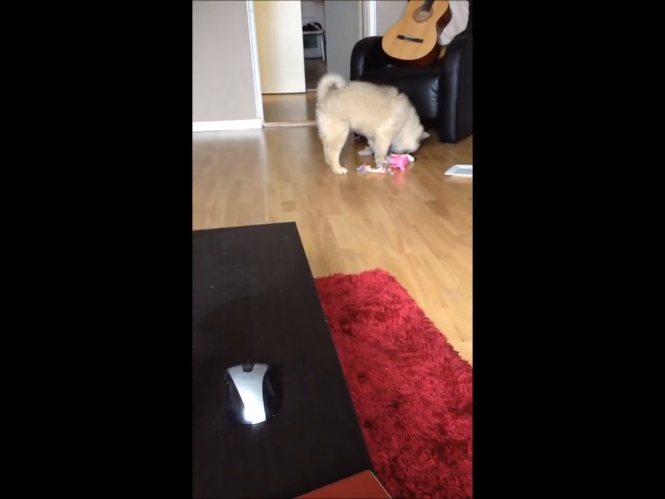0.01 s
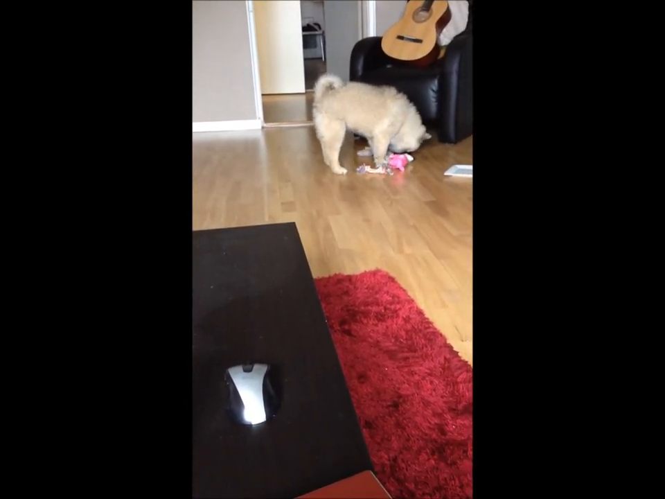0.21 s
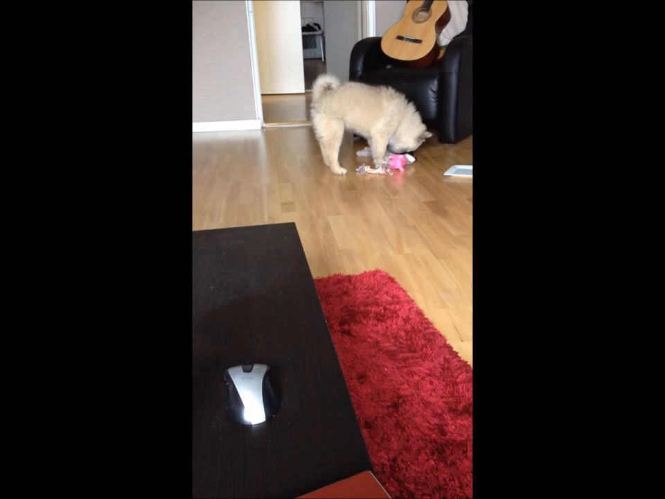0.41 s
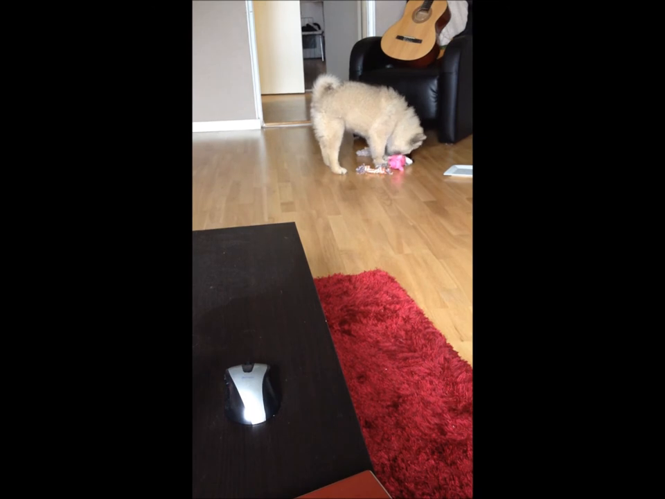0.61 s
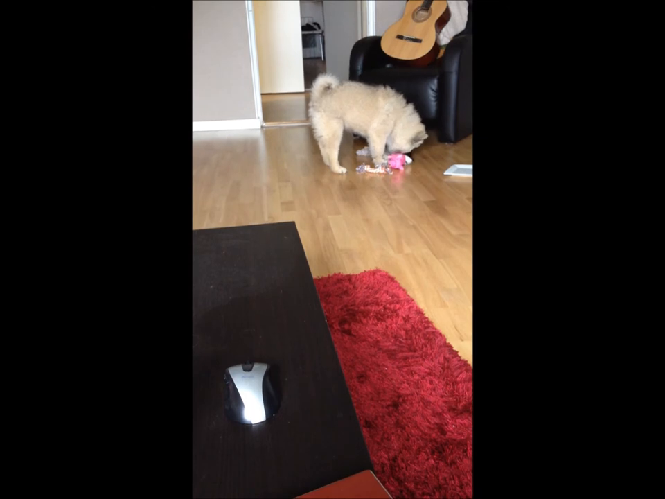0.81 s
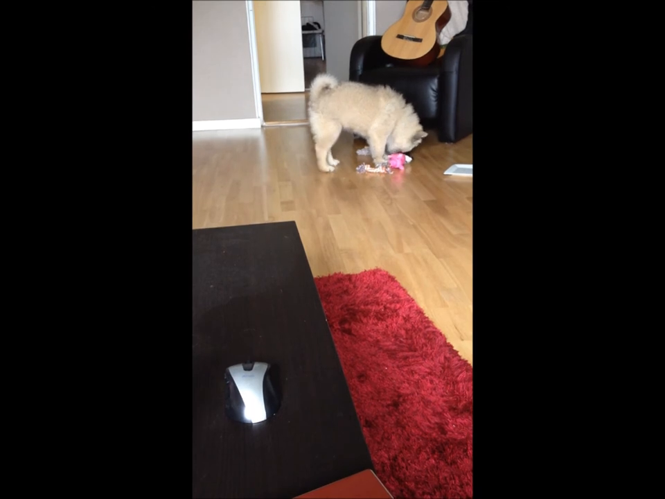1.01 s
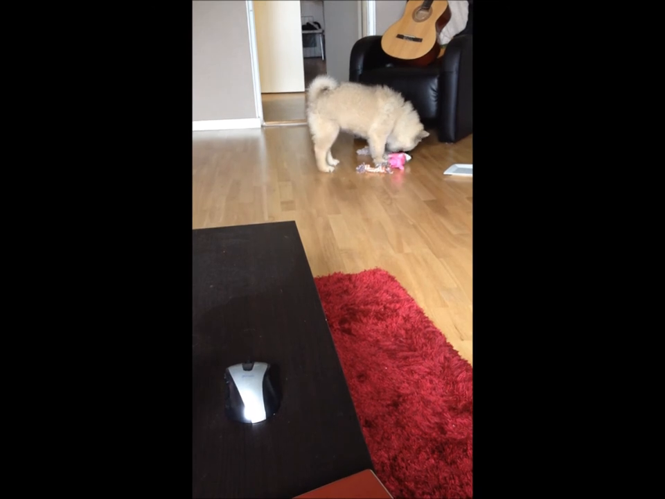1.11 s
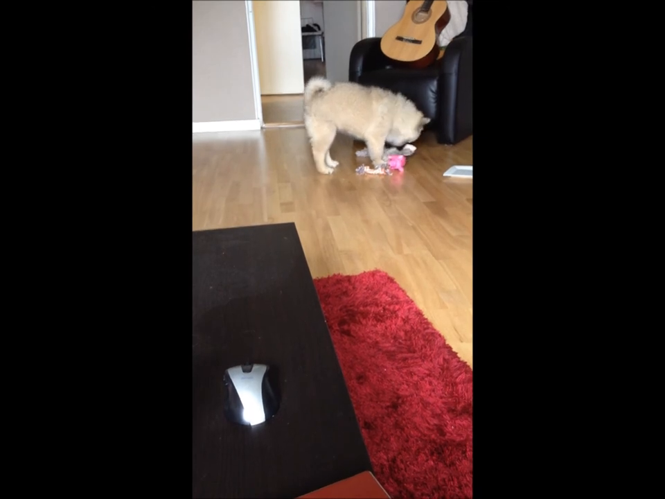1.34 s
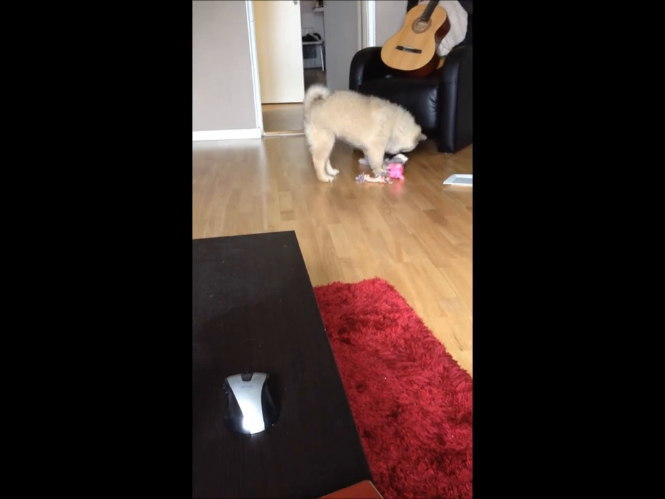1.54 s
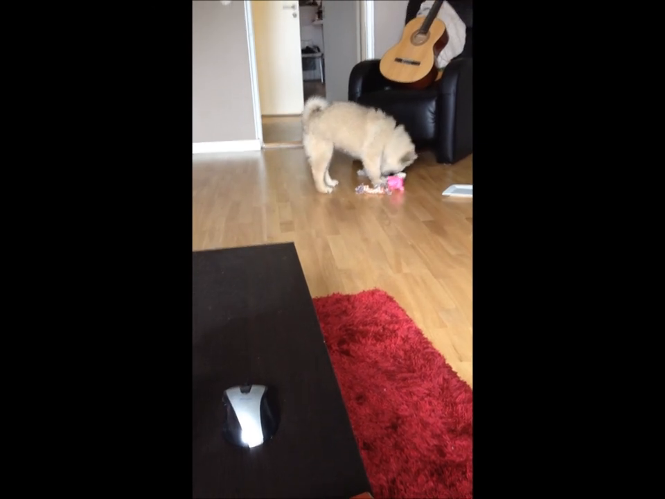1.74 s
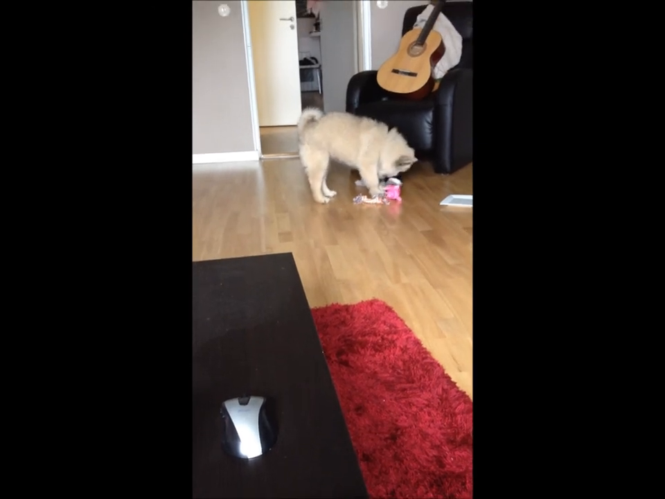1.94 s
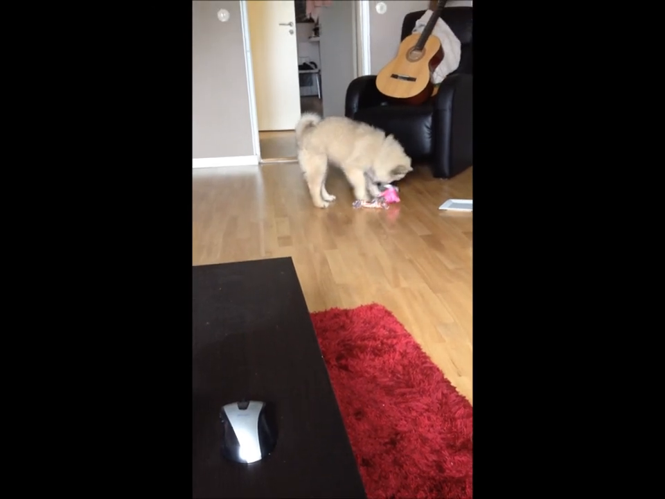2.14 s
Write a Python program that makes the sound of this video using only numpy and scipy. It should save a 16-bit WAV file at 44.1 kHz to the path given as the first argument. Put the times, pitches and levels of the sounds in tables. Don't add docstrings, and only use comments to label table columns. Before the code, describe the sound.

A squeaky toy is bitten four times by a small dog, each sharp squeak rising, flipping higher and choking with a puff of air, then a lower squeal as it refills; bare reverberant room, phone microphone.

```python
import sys
import numpy as np
from scipy import signal
from scipy.fft import rfft, irfft, next_fast_len
from scipy.io import wavfile
from scipy.ndimage import uniform_filter1d, map_coordinates

SR = 44100
rng = np.random.default_rng(int(sys.argv[2]) if len(sys.argv) > 2 else 0)


def wrap_up_sound(samples):
    columns = np.atleast_2d(samples).T
    tamed = np.clip(columns, -1, 1)
    steps = np.round(tamed * 32767).astype(np.int16)
    wavfile.write(sys.argv[1], SR, steps)


def volts_from_decibels(level):
    exponent = np.asarray(level, float) / 20
    return 10 ** exponent


N = 97020
LEAD = SR // 5
TOP_HZ = 15600


def unit(x):
    return x / np.sqrt(np.mean(x ** 2) + 1e-20)


def along(points, hz):
    f, v = np.transpose(points)
    return np.interp(np.log(hz + 1), np.log(f + 1), v)


def filtered(x, response):
    m = next_fast_len(x.shape[-1] + SR // 2)
    spectrum = rfft(x, m) * response(np.fft.rfftfreq(m, 1 / SR))
    return irfft(spectrum, m)[..., :x.shape[-1]]


def noise(colour, size):
    return unit(filtered(rng.standard_normal(size), lambda hz: volts_from_decibels(along(colour, hz))))


def add(track, s, x):
    part = track[round(s * SR) + LEAD:][:len(x)]
    part += x[:len(part)]


def quiet_room():
    # f/Hz, level/dB
    floor_colour = [(15, -54), (25, 18), (665, 0.5), (1610, -3), (2290, 0), (3000, -9), (3720, -11),
                    (4990, -6), (15400, -11.5)]
    hum_hz, hum_width_hz = 205, 21
    hum = filtered(rng.standard_normal(N), lambda hz: 1 / (1 + ((hz - hum_hz) / hum_width_hz) ** 2))
    return volts_from_decibels(-66.5) * noise(floor_colour, N) + volts_from_decibels(-74.5) * unit(hum)


def room(x):
    # f/Hz, t60/s
    reverb_times = [(200, .45), (1200, 0.46), (4000, 0.5), (8000, 0.38), (11000, 0.27), (14000, 0.1)]
    gap_s, build_s, first_t60_s, early_s = .003, 0.0099, 0.1, .022
    tail_db, first_db, early_db = 7, 1.5, -9

    hz, t, z = signal.stft(rng.standard_normal(SR * 3 // 4), SR, nperseg=256)
    t60 = np.clip(along(reverb_times, hz), .05, 2)[:, None]
    tail = signal.istft(z * volts_from_decibels(-60 * t / t60) / np.sqrt(t60), SR, nperseg=256)[1]
    t = np.arange(len(tail)) / SR
    tail = tail * (1 - np.exp(-t / build_s))
    tail = tail * (1 + volts_from_decibels(first_db - 60 * t / first_t60_s))
    tail = np.pad(volts_from_decibels(tail_db) * tail / np.linalg.norm(tail), (round(gap_s * SR) + 1, 0))

    when, sign = rng.uniform(size=(2, 8))
    echoes = volts_from_decibels(early_db) * np.sign(sign - .5) * (1 - when / 2)
    tail[(20 + when * early_s * SR).astype(int)] += echoes
    tail[0] = 1
    return signal.fftconvolve(x, tail) / np.linalg.norm(tail)


def bump(db, t60, ring_hz):
    q = 1.5
    t = np.arange(SR // 5) / SR
    resonance = lambda hz: 1 / (1 + (q * (hz / ring_hz - ring_hz / (hz + 1))) ** 2)
    body = unit(filtered(rng.standard_normal(len(t)), resonance))
    onset = 1 - np.exp(-t / 0.001)
    return volts_from_decibels(db - 60 * t / t60) * onset * body


def bumps(track):
    # t/s, level/dB, t60/s, ring f/Hz
    contacts = [
        (.07, -57.5, 0.14, 283),
        (.33, -66, 0.081, 350),
        (.49, -57.5, 0.12, 204),
        (1.59, -59.5, 0.23, 375),
        (1.665, -45.5, 0.35, 1760),
        (1.682, -40.5, 0.041, 1720),
        (1.684, -47, .06, 240),
        (1.686, -49.5, 0.077, 550),
        (1.705, -57.5, 0.3, 1820),
    ]
    for s, db, t60, ring_hz in contacts:
        add(track, s, room(bump(db, t60, ring_hz)))


def puff(db, t60):
    # f/Hz, level/dB
    air_colour = [(90, -8), (250, -8.5), (700, 6.5), (2000, 3.5), (5000, 5), (7500, -53), (10000, -62),
                  (15000, -37)]
    # f/Hz, level/dB
    slap_colour = [(80, -22), (200, -1.5), (500, 3.5), (900, 2), (1600, -3), (4000, -41)]
    slap_db, slap_t60_s = 1.5, .02
    t = np.arange(SR // 5) / SR
    air = volts_from_decibels(-60 * t / t60) * noise(air_colour, len(t))
    slap = volts_from_decibels(slap_db - 60 * t / slap_t60_s) * noise(slap_colour, len(t))
    return volts_from_decibels(db) * (air + slap)


def puffs(track):
    # t/s, level/dB, t60/s
    bursts = [
        (.199, -35, 0.077),
        (.479, -48, .12),
        (.679, -35, 0.14),
        (.999, -36, 0.095),
        (1.375, -36, 0.14),
    ]
    for s, db, t60 in bursts:
        add(track, s, room(puff(db, t60)))


def reed(rows, colour, voice, jitter, hiss_db):
    wander, wander_rate = .0035, 60
    flip_jitter, jitter_rate = .016, 400
    flutter_db, flutter_rate = 0.5, 55.7
    whistle_hz, whistle_width_hz = 8400, 1500
    fade_s = .0025

    s, pitch, level = np.transpose(rows)
    tilt_db, whistle_db, flip_s = voice
    t = s[0] + np.arange(round((s[-1] - s[0]) * SR)) / SR
    since = t - s[0]
    flipped = t > flip_s
    k = np.arange(1, 15)[:, None]

    shake = map_coordinates(rng.standard_normal(SR // 20), [since * jitter_rate])
    slow = map_coordinates(rng.standard_normal(64), [since * wander_rate])
    knots = np.broadcast_arrays(k - 1, since * flutter_rate)
    flutter = map_coordinates(rng.standard_normal((15, 64)), knots)

    hz = uniform_filter1d(np.interp(t, s, pitch), size=24, mode="nearest")
    hz = hz * (1 + wander * slow + np.where(flipped, flip_jitter, jitter) * shake)
    phase = 2 * np.pi * np.cumsum(hz) / SR

    whistle = whistle_db * np.exp(-((k * hz - whistle_hz) / whistle_width_hz) ** 2)
    tilt = (tilt_db - 0.5 * flipped) * np.log2(k)
    gains = volts_from_decibels(along(colour, k * hz) + tilt + whistle + flutter_db * flutter) * (k * hz < TOP_HZ)
    tone = unit(np.sum(gains * np.sin(k * phase + k * k), axis=0))

    hiss = noise([(600, -24)] + colour, SR // 2)[:len(t)] * (1 + np.cos(phase))
    fade = np.clip(np.minimum(since, s[-1] - t) / fade_s, 0, 1) ** 2
    return fade * volts_from_decibels(np.interp(t, s, level)) * (tone + volts_from_decibels(hiss_db) * hiss)


def refills(track):
    # t/s, reed pitch f/Hz, level/dB
    squeals = [
        [(-.14, 1223, -37), (-.02, 1180, -41)],
        [(.302, 1060, -60), (.308, 1028, -39), (.345, 1025, -72), (.360, 1010, -62)],
        [(.360, 1173, -54), (.372, 1168, -28.5), (.388, 1217, -35), (.440, 1159, -34.5), (.476, 1166, -36),
         (.482, 1254, -35.5), (.515, 1205, -49.5)],
        [(.797, 1158, -44), (.810, 1129, -36), (.835, 1132, -34.5), (.850, 1201, -37), (.885, 1122, -39),
         (.905, 1180, -106)],
        [(1.128, 1107, -32), (1.152, 1251, -35), (1.170, 1179, -39), (1.210, 1167, -32), (1.285, 1112, -41.5),
         (1.315, 1110, -81)],
        [(1.440, 1170, -33), (1.480, 1168, -33.5), (1.530, 1120, -37), (1.590, 1153, -40.5),
         (1.620, 1231, -46.5)],
        [(1.774, 1127, -32), (1.782, 1078, -47), (1.800, 1059, -53), (1.815, 1000, -70)],
        [(1.850, 1138, -34), (1.880, 1191, -35), (1.905, 1155, -45), (1.925, 1124, -43.5), (1.945, 1052, -48.5)],
    ]
    # tilt/dB per octave, whistle level/dB (weak ones do not whistle), flip t/s
    squeal_voices = [(-2, 7.5, 3), (-1, -4, 3), (-0.36, -0.8, .479), (-1.7, 4.3, 3), (-1.04, 1.7, 3),
                     (0.75, 1.4, 3), (1, -21.5, 3), (0.5, 0, 3)]
    # f/Hz, level/dB
    squeal_colour = [(1150, -0.5), (2350, -6.5), (3500, -11.5), (4700, -14.5), (5800, -20.5), (7500, 2.5),
                     (9300, -13), (13000, -29)]
    for rows, voice in zip(squeals, squeal_voices):
        add(track, rows[0][0], room(reed(rows, squeal_colour, voice, jitter=.001, hiss_db=-36)))


def bites(track):
    # t/s, reed pitch f/Hz, level/dB
    squeaks = [
        [(.186, 1456, -88), (.189, 1443, -27), (.198, 1529, -26.5), (.200, 1787, -22.5), (.208, 1786, -36),
         (.222, 1446, -33), (.230, 1330, -64)],
        [(.641, 1189, -30), (.648, 1228, -37.5), (.660, 1523, -22.5), (.678, 1539, -61), (.680, 1929, -24.5),
         (.692, 1683, -25.5), (.704, 1355, -38), (.712, 1260, -61)],
        [(.964, 1170, -36), (.970, 1417, -31), (.980, 1789, -19), (.998, 1849, -26.5), (1.000, 2017, -22.5),
         (1.024, 1899, -28), (1.036, 1616, -25.5), (1.050, 1359, -30), (1.060, 1250, -49)],
        [(1.329, 1372, -28.5), (1.338, 1644, -28), (1.348, 1737, -25.5), (1.374, 1796, -24),
         (1.376, 2087, -21.5), (1.392, 1955, -24.5), (1.408, 1784, -33), (1.418, 1450, -28)],
        [(2.195, 1250, -86), (2.198, 1307, -38.5), (2.21, 1450, -8)],
    ]
    # tilt/dB per octave, whistle level/dB, flip t/s
    squeak_voices = [(-0.27, 6, .199), (-0.04, 2.7, .679), (-.5, 2.3, 0.72), (3.1, 2.2, 1.5), (-3.7, 14, 3)]
    # f/Hz, level/dB
    squeak_colour = [(1200, -9.5), (1900, -6), (2900, -13.5), (4500, -13), (5800, -10.5), (7300, -7.5),
                     (8800, -21), (14000, -38)]
    for rows, voice in zip(squeaks, squeak_voices):
        add(track, rows[0][0], room(reed(rows, squeak_colour, voice, jitter=.004, hiss_db=-27.5)))


def scene():
    track = np.zeros(N + LEAD)
    bumps(track)
    puffs(track)
    refills(track)
    bites(track)
    return (track[LEAD:] + quiet_room())[None]


def low_pass(x):
    return signal.sosfilt(signal.butter(12, 15600, fs=SR, output="sos"), x)


def record(dry):
    low_cut_hz, low_cut_slope = 170, 3.3
    notch_hz, notch_width_hz, notch_db = 10910, 850, -13.5
    roll_hz, roll_db = 14300, -14

    def microphone(hz):
        low_cut = 1 / np.sqrt(1 + (low_cut_hz / (hz + 1)) ** (2 * low_cut_slope))
        notch = notch_db * np.exp(-((hz - notch_hz) / notch_width_hz) ** 2)
        roll = roll_db * np.clip(hz - roll_hz, 0, None) / 1000
        return low_cut * volts_from_decibels(notch + roll) * (hz < TOP_HZ)

    mix = filtered(dry, microphone) + volts_from_decibels(-110) * rng.standard_normal(dry.shape)
    return low_pass(mix)


dry = scene()
out = record(dry)
wrap_up_sound(out)
```